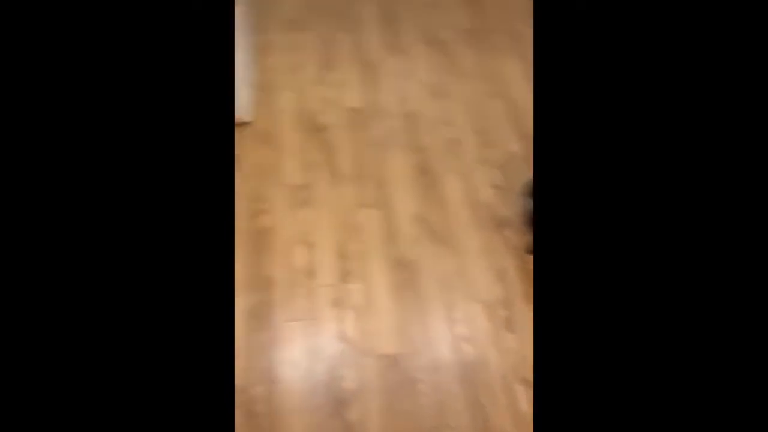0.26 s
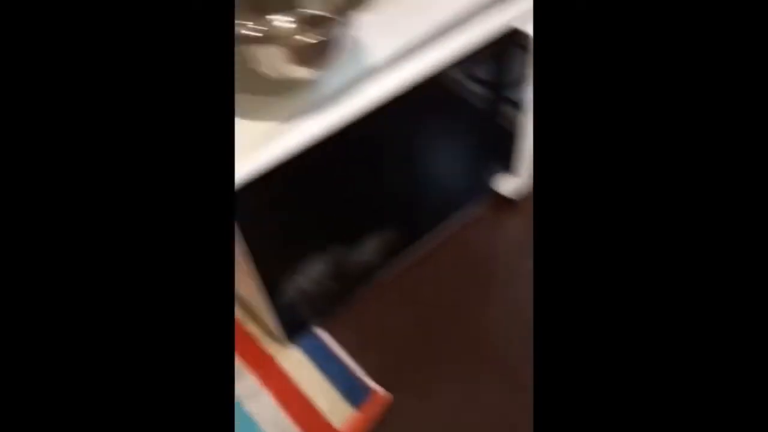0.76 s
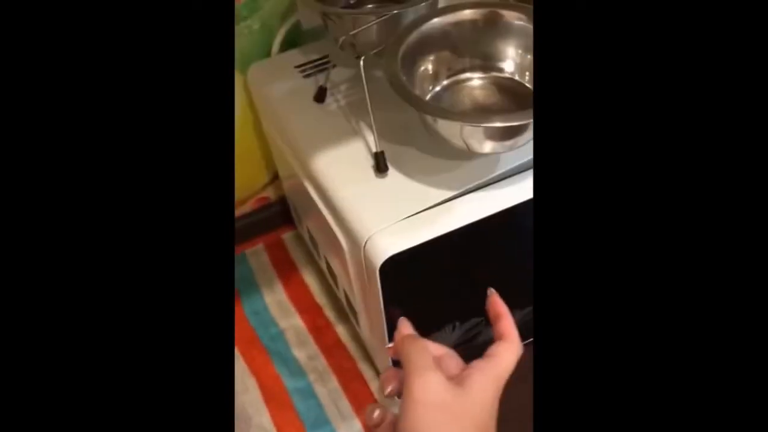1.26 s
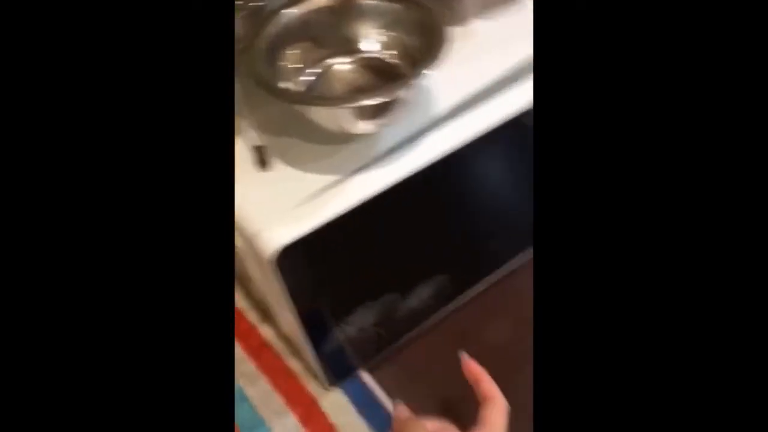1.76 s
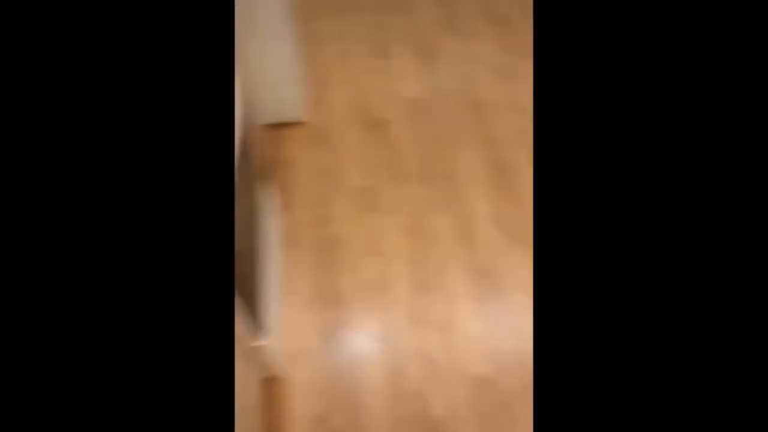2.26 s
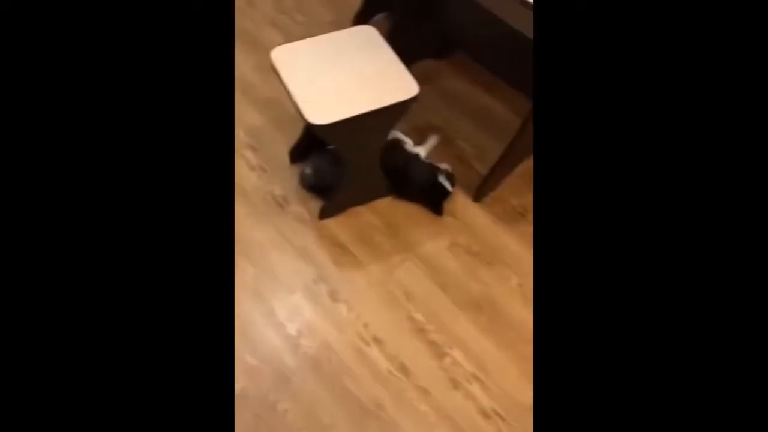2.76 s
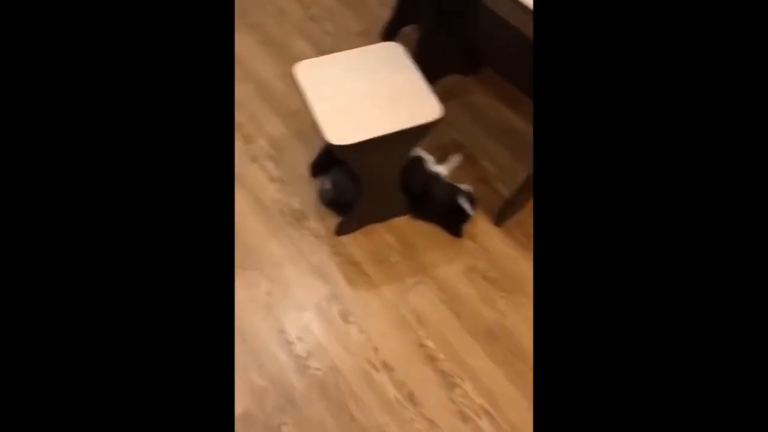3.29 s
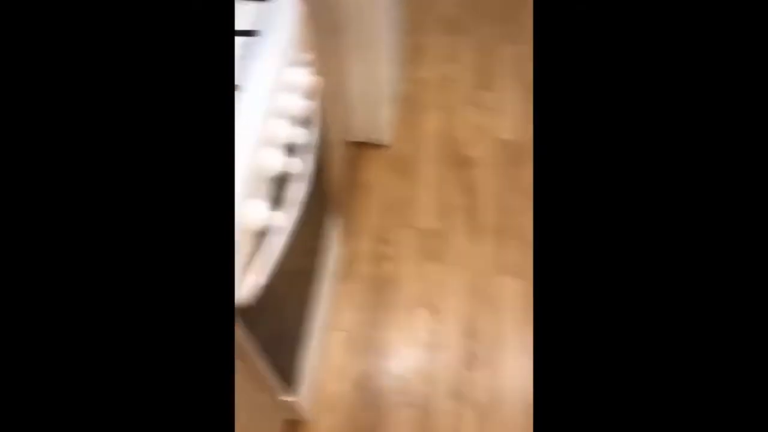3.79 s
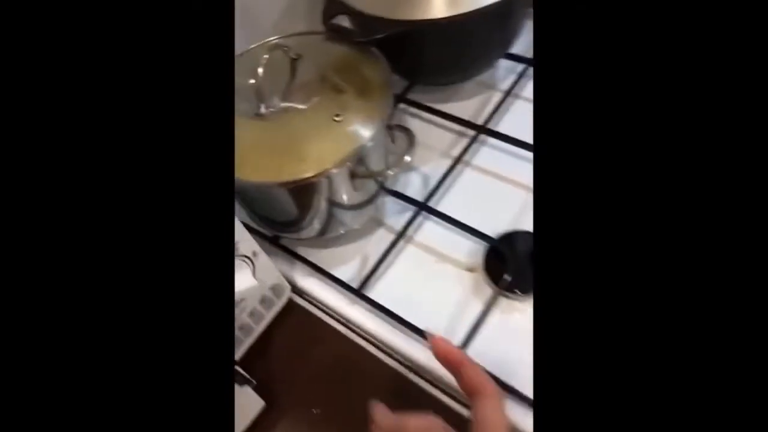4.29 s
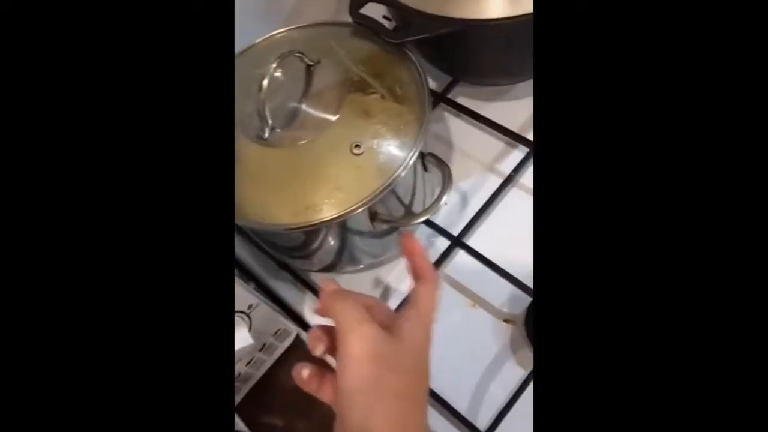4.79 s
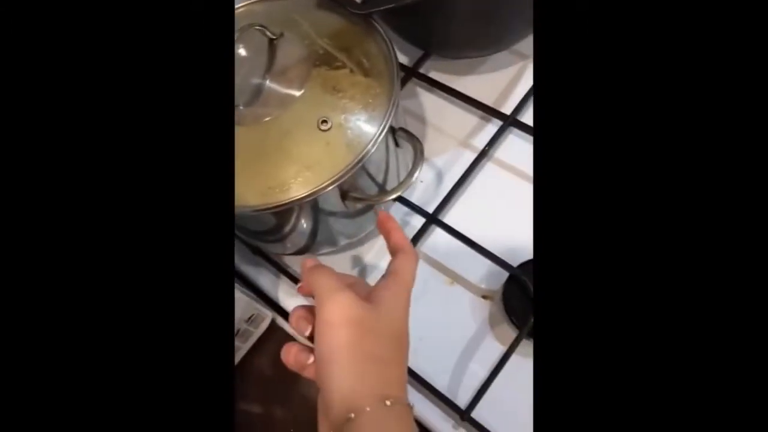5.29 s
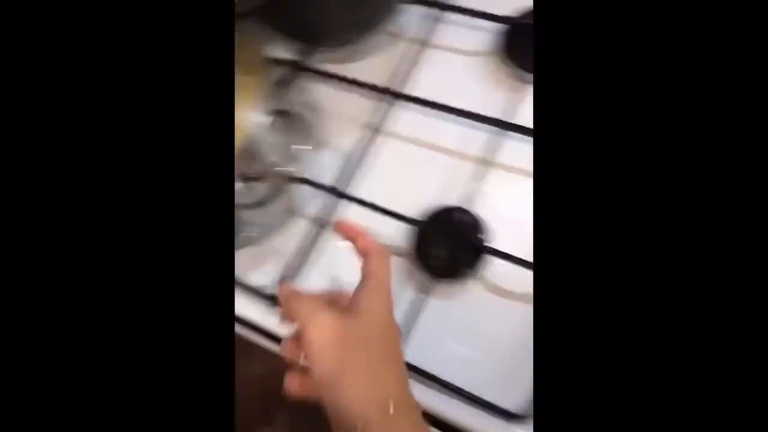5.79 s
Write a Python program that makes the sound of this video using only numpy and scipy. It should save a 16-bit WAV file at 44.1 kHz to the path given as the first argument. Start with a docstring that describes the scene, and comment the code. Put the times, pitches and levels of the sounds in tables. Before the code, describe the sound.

One hard knock booms on a microwave door, then quick fingernail taps ring on a metal stove top, with faint slipper shuffles between.

```python
"""Knock and taps in a small kitchen.

One knuckle knock booms in a microwave door, then quick fingernail taps ring a stove's enamelled steel top.
Slippers shuffle on laminate with small ticks of sole and floor as the holder of a phone turns.
A fridge hums over the hiss of room and microphone."""
import sys
import numpy as np
from scipy import signal
from scipy.fft import rfft, irfft, next_fast_len
from scipy.io import wavfile
from scipy.ndimage import uniform_filter1d

SR = 44100
rng = np.random.default_rng(int(sys.argv[2]) if len(sys.argv) > 2 else 0)


def log_audio(samples):
    """Write samples as a 16-bit WAV file to the path given in sys.argv[1]."""
    # one column per channel
    frames = np.atleast_2d(samples).T
    # limit to full scale, then quantise
    limited = np.clip(frames, -1, 1)
    pcm = np.round(limited * 32767).astype(np.int16)
    wavfile.write(sys.argv[1], SR, pcm)


N = 266707

# Blows: start_s, click_db, ring_db, room_db, hardness_db_per_octave
DOOR_KNOCK = [(1.545, -15, -19.5, -24, 0.3)]
STOVE_TAPS = [(5.012, -29, -43, -44.5, 2.4), (5.023, -32, -33, -34.5, -3.5),
              (5.284, -14.5, -27.5, -27.5, 0.14), (5.507, -10.5, -31, -27.5, 2.3),
              (5.715, -7, -31.5, -24.5, 3.4)]
# Modes of door with cabinet, and of steel top: pitch_hz, level_db, t60_s
DOOR_MODES = [(98, -10, 0.68), (116, 1, 0.43), (130.1, 3.5, 0.25), (185.2, 2, 0.34), (223, 3, 0.1),
              (247, -18.5, 0.31), (266, -11, 0.2215), (365.7, -12, 0.4), (635, -7.5, 0.26),
              (737.06, -27, 0.1625), (858, -18, 0.31), (930, -21, 0.38), (1620, -20, .25)]
STOVE_MODES = [(95.4, -9, 0.5), (105, -11, 0.44), (111.7, -12, 0.44), (124.22, -6.5, 0.34), (178, -9, 0.21),
               (258, -3.5, 0.36), (313, -15, 0.56), (363.9, 3.5, 0.19), (500, -9.5, 0.14), (644, -14, 0.25),
               (696.21, 2, 0.21), (1074, -7, 0.2), (1373, -0.5, 0.084), (1497.3, -17.5, 0.51),
               (1975, -10, 0.19155), (2400, -16, 0.12), (2655.6, -15.5, 0.27), (3325, -17, 0.3822),
               (3770, -3, 0.09467), (4140, -26, 0.2), (4760, -27, 0.377), (5130, -22.5, 0.1884),
               (5430, -15, 0.2313), (6000, -20, 0.3829), (6800, -14, 0.18), (7600, -18, 0.19),
               (8128, -24, 0.22), (8900, -19, 0.2107)]
# Contact click spectra: freq_hz, density_db
DOOR_CLICK = [(500, -16), (850, 0.5), (1300, 2.5), (1900, -11), (3200, -20), (3750, -5), (4200, -12.5),
              (5100, -3), (6500, -9.5), (8500, -23), (11500, -24), (15200, -30), (16500, -58)]
STOVE_CLICK = [(600, -13.5), (1100, -11), (1400, 1.5), (1650, -7), (1950, -22), (3300, -10.5), (3900, -6),
               (6300, -0.5), (7400, -6), (8800, 2), (10200, -14.5), (12000, -11.5), (15200, -17.5),
               (16700, -62)]
# Room tail spectra: freq_hz, density_db
DOOR_TAIL = [(50, -34), (85, -6), (120, -7.5), (200, -8), (285, -18.5), (370, -16.5), (500, -19.5),
             (700, -14), (1100, -24), (1650, -22.5), (2500, -34.5), (5300, -30), (7200, -33.5), (8500, -42),
             (15500, -53)]
STOVE_TAIL = [(50, -20), (80, 0.5), (120, 0.5), (185, -9), (300, -1.5), (500, -9), (700, -6.5), (900, -9),
              (1400, -14), (2200, -18.5), (3000, -19), (4200, -17), (6300, -16), (9000, -18.5),
              (10300, -27.5), (12000, -27.5), (15500, -38)]
# Slipper strokes: start_s, swell_s, scuff_db, body_rel_db, grit_rel_db
SLIPPER_STROKES = [(.125, 0.13, -57, -3, -0.5), (.480, 0.06416, -49.5, -8.5, 2.5),
                   (.590, 0.027, -55, -4, -2.5), (.690, 0.038, -56.5, -4, 1),
                   (.810, 0.097, -46, -2.5, -1.5), (1.049, 0.091, -40.5, -4.5, -3),
                   (1.900, 0.17, -61, -6, -3.5), (2.083, 0.065, -46.5, -6, -1.5),
                   (2.310, 0.036, -59.5, -6, -2), (3.050, 0.12, -60.5, -10, 0.5),
                   (3.355, 0.10406, -51.5, -10, -2.5), (3.430, 0.078, -49, -5.5, 3.5),
                   (3.960, 0.067, -57.5, -1.5, 0.5), (4.040, 0.15, -45.5, -8, -5),
                   (4.190, 0.04148, -48, -19, -4.5), (4.442, 0.06923, -45, -8, -2.5),
                   (5.990, 0.091, -51, -3, 2)]
# Sole friction spectra, low to high: freq_hz, density_db
SOLE_BODY = [(250, -21), (500, -8), (750, -7), (1100, 6.5), (1400, -3.5), (2200, -47)]
SOLE_SCUFF = [(700, -39), (1500, -1.5), (2000, -2.5), (3200, -3), (4800, -8), (8000, -22.5)]
SOLE_GRIT = [(3000, -38), (5000, -9.5), (6500, -6.5), (10500, -12), (12500, -11.5), (15500, -15.5)]
# Sole and floor ticks: start_s, level_db, pitch_hz, t60_cycles, snap_rel_db
FLOOR_TICKS = [(0.648, -37, 1058, 21.02, -21), (0.692, -42, 1060, 20, -20), (1.075, -52, 1160, 16, -10),
               (1.151, -30.5, 1188, 24, -20), (2.106, -40.5, 1149, 22, 1), (3.375, -38, 2280, 17.44, -9),
               (3.503, -36, 2900, 11.56, 4), (3.8691, -29.5, 433.9, 5.9, -32),
               (4.033, -37.5, 1030, 17, -17.5), (4.102, -35.5, 959.4, 16, -25),
               (4.166, -40.5, 1230, 33, -20), (4.461, -41, 1130, 19.02, -19.5),
               (4.529, -35.5, 1030, 49, -18)]
# Low hum level, swelling briefly after the door knock: time_s, fundamental_db, octave_db
FRIDGE_HUM = [(0.0, -57.5, -57.5), (0.3, -75, -56), (0.45, -52, -55), (1.45, -49.5, -55), (1.68, -50, -52),
              (1.85, -46, -48), (2.0, -53, -56.5), (2.6, -51, -59), (3.3, -59, -59.5), (4.3, -56, -60.5),
              (5.0, -59, -62.5), (6.05, -63, -57)]
# Background spectra: freq_hz, density_db
FRIDGE_RUMBLE = [(15, -40), (30, -11), (42, 3.5), (60, 3.5), (107, -12), (124, -7), (345, -13.5),
                 (419, -17.5), (900, -38.5), (1170, -55.5), (1980, -120)]
ROOM_HISS = [(350, -15), (600, -1), (736, -5), (942, -3.5), (1540, -7), (1670, -7.5), (2020, -8.5),
             (2620, -9), (3690, -11.5), (9000, -16), (10500, -20), (12500, -14.5), (15700, -19)]
# Kitchen reverberation: freq_hz, t60_s
ROOM_DECAY = [(100, 1), (300, 0.74), (1000, 0.4775), (5000, 0.67), (9000, 0.47), (14000, 0.3375)]

NOISE_TOP_HZ, BAND_TOP_HZ = 15650, 16855


def door_knock():
    """A knuckle on the glass door booms in the hollow cabinet."""
    return struck(DOOR_KNOCK, DOOR_MODES, DOOR_CLICK, DOOR_TAIL, opposed=False,
                  snap_db=-3, click_t60_s=0.049, rise_cycles=0.68, waver=0.5, tail_rise_s=0.0017)


def stove_taps():
    """Nails on thin enamelled steel: bright clatter over a tinny ring."""
    return struck(STOVE_TAPS, STOVE_MODES, STOVE_CLICK, STOVE_TAIL, opposed=True,
                  snap_db=-32, click_t60_s=0.05, rise_cycles=3.2, waver=0.21, tail_rise_s=0.00049)


def struck(blows, modes, click_spectrum, tail_spectrum, opposed,
           snap_db, click_t60_s, rise_cycles, waver, tail_rise_s):
    """Each blow: a noise click with a sharp snap, modes at fresh strengths, a room tail."""
    out, t = np.zeros(N + SR), np.arange(SR) / SR
    drift = waver * t / (t + 0.03)  # reflections gradually unsettle level and phase
    click_fall = amp(-60 * t / click_t60_s) + amp(snap_db - 60 * t / 0.01)
    click_envelope = click_fall * (1 - np.exp(-t / 0.00017))
    for start_s, click_db, ring_db, room_db, hardness in blows:
        tilt_db = lambda hz: hardness * np.log2(1 + hz / 500)  # harder blow, more treble
        click = amp(click_db) * click_envelope * noise(click_spectrum, size=SR, top_hz=BAND_TOP_HZ)
        ring = np.zeros(SR)
        for k, (hz, db, t60_s) in enumerate(modes):
            strike_db = db + tilt_db(hz) + rng.normal(0, 1.5)
            fall = amp(strike_db - 60 * t / t60_s + 2.468 * drift * wobble(36.6, size=SR))
            rise = 1 - np.exp(-t * hz / rise_cycles)
            sign = (-1) ** k if opposed else 1  # opposed neighbours cancel first, bloom later
            phase = 2 * np.pi * hz * t + drift * wobble(25.7, size=SR)
            ring += sign * fall * rise * np.sin(phase)
        tail = room_tail([(hz, db + tilt_db(hz)) for hz, db in tail_spectrum], modes)
        tail *= amp(room_db) * (1 - np.exp(-t / tail_rise_s))
        out[round(start_s * SR):][:SR] += click + amp(ring_db) * ring + tail
    return out[:N]


def slippers(body_t60_s=0.37, scuff_t60_s=0.61, grit_t60_s=0.5453):
    """Soles drag on laminate: three bands of friction noise swell and fade with each stroke."""
    t = np.arange(N) / SR
    grain = amp(0.51 * wobble(150) + 0.19 * wobble(40))  # stick-slip
    bands = [rasp(grain * noise(band), depth_db=2.0) for band in (SOLE_BODY, SOLE_SCUFF, SOLE_GRIT)]
    power = np.zeros((3, N))
    for start_s, swell_s, scuff_db, body_db, grit_db in SLIPPER_STROKES:
        swell = np.clip((t - start_s) / swell_s, 0, 1) ** 1.0457
        past_peak_s = np.maximum(t - start_s - swell_s, 0)
        fades_db = [body_db - 60 * past_peak_s / body_t60_s,
                    -60 * past_peak_s / scuff_t60_s,
                    grit_db - 60 * past_peak_s / grit_t60_s]
        power += (swell * amp(scuff_db) * amp(fades_db)) ** 2
    return np.sum(np.sqrt(power) * bands, axis=0)


def floor_ticks():
    """Soles and boards tick: damped pop, bright snap, faint room echo."""
    out, t = np.zeros(N + SR), np.arange(SR) / SR
    for start_s, db, hz, t60_cycles, snap_db in FLOOR_TICKS:
        envelope = (1 - np.exp(-t * hz / 0.47)) * amp(-60 * t * hz / t60_cycles)
        pop = envelope * np.sin(2 * np.pi * hz * t)
        snap = amp(snap_db - 60 * t / 0.018) * noise(SOLE_GRIT, size=SR)
        echo_spectrum = [(hz / 3, -30), (hz / 2.55, -3), (hz * 1.02, -3), (hz * 4, -30)]
        echo = amp(-21.5) * t60_cycles / 16 * room_tail(echo_spectrum)
        out[round(start_s * SR):][:SR] += amp(db) * (pop + snap + echo)
    return out[:N]


def fridge(mains_hz=49.5):
    """Mains hum and its octave, wavering in level and phase, over a low rumble."""
    t = np.arange(N) / SR
    time_s, fundamental_db, octave_db = np.transpose(FRIDGE_HUM)
    phase = 2 * np.pi * mains_hz * t
    fundamental_rms = amp(np.interp(t, time_s, fundamental_db) + 1.6 * wobble(9))
    fundamental = fundamental_rms * np.sin(phase + 0.6 * wobble(2.3))
    octave_rms = amp(np.interp(t, time_s, octave_db) + 2.1 * wobble(12))
    octave = octave_rms * np.sin(2 * phase + 1.058 * wobble(5.6))
    rumble = amp(-52.5 + 2.2 * wobble(5.03)) * noise(FRIDGE_RUMBLE)
    return np.sqrt(2) * (fundamental + octave) + rumble


def hiss():
    """Room air and microphone hiss, wavering slightly."""
    return amp(-60.0 + 1.3696 * wobble(2.29)) * noise(ROOM_HISS)


def room_tail(spectrum, modes=(), peak_db=6, half_width_hz=14.8):
    """Diffuse 1 s tail with peaks at the modes above 250 Hz; each frequency decays at its own rate."""
    peaks = lambda f: sum(1 / (1 + ((f - hz) / half_width_hz) ** 2) for hz, _, _ in modes if hz > 250)
    wash = unit(filtered(noise(spectrum, size=SR), lambda f: amp(peak_db * peaks(f))))
    hz, t, bins = signal.stft(wash, SR, nperseg=512)
    decay = amp(-60 * t / log_interp(ROOM_DECAY, hz)[:, None])
    return signal.istft(bins * decay, SR, nperseg=512)[1][:SR]


def rasp(x, depth_db):
    """Roughen noise with random gain patches in time and frequency; rms 1."""
    bins = signal.stft(x, nperseg=512)[2]
    patches = uniform_filter1d(rng.standard_normal(bins.shape), size=3, axis=0)
    patches = unit(uniform_filter1d(patches, size=4, axis=1))
    return unit(signal.istft(bins * amp(depth_db * patches), nperseg=512)[1][:N])


def noise(spectrum, size=N, top_hz=NOISE_TOP_HZ):
    """Coloured noise, rms 1."""
    response = lambda hz: amp(log_interp(spectrum, hz)) * (hz < top_hz)
    return unit(filtered(rng.standard_normal(size), response))


def wobble(rate_hz, size=N):
    """Straight lines between Gaussian random knots."""
    knots = rng.standard_normal(int(size * rate_hz / SR) + 2)
    return np.interp(np.arange(size) * rate_hz / SR, np.arange(len(knots)), knots)


def filtered(x, response):
    """Zero-phase filter with gain response(hz)."""
    n_fft = next_fast_len(x.shape[-1] + SR // 2)
    gain = response(np.fft.rfftfreq(n_fft, 1 / SR))
    return irfft(rfft(x, n_fft) * gain, n_fft)[..., :x.shape[-1]]


def log_interp(points, hz):
    """Interpolate (freq_hz, value) points on a log frequency axis."""
    freq_hz, values = np.transpose(points)
    return np.interp(np.log(hz + 1), np.log(freq_hz + 1), values)


def amp(db):
    """dB to gain."""
    return 10 ** (np.asarray(db) / 20)


def unit(x):
    """Scale to rms 1."""
    return x / np.sqrt(np.mean(x ** 2) + 1e-20)


def scene():
    """All sources, mono."""
    return (door_knock() + stove_taps() + slippers() + floor_ticks() + fridge() + hiss())[None]


def record(dry):
    """Microphone: soft peak clipping, bass roll-off, band limit."""
    ceiling, low_cut_hz = 0.72, 33.6
    soft = dry / (1 + np.abs(dry / ceiling) ** 4) ** (1 / 4)
    return filtered(soft, lambda hz: (hz < BAND_TOP_HZ) * hz ** 4 / (hz ** 4 + low_cut_hz ** 4))


dry = scene()
out = record(dry)
log_audio(out)
```